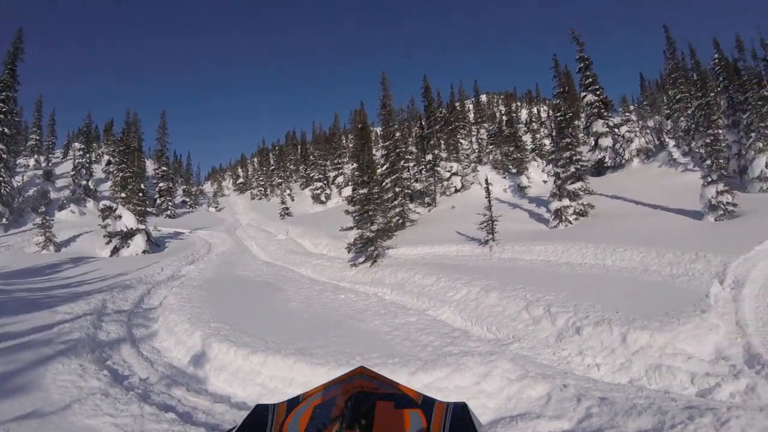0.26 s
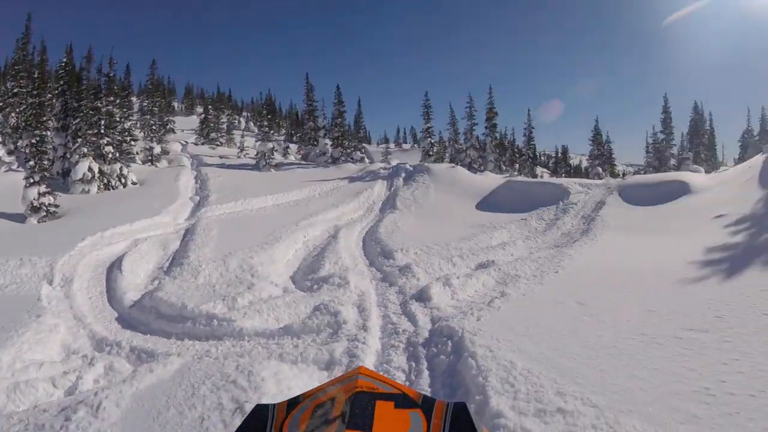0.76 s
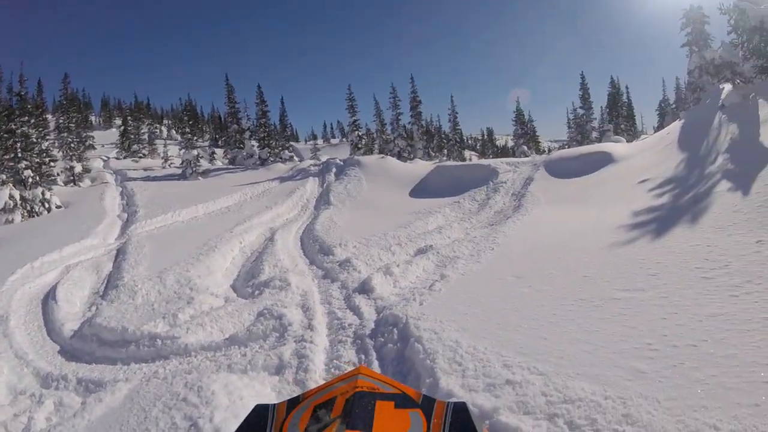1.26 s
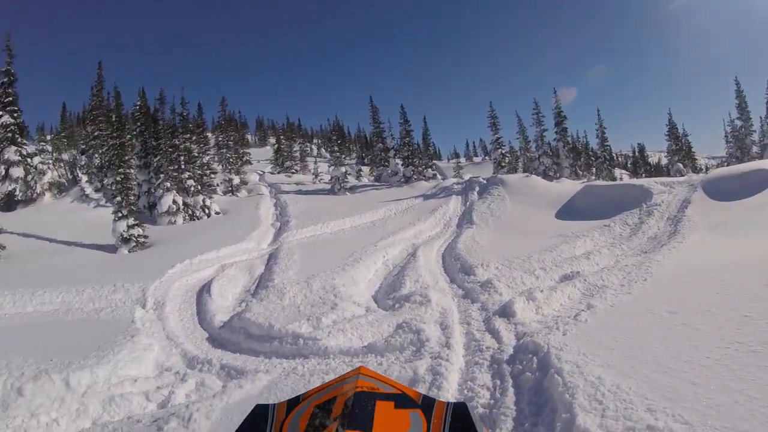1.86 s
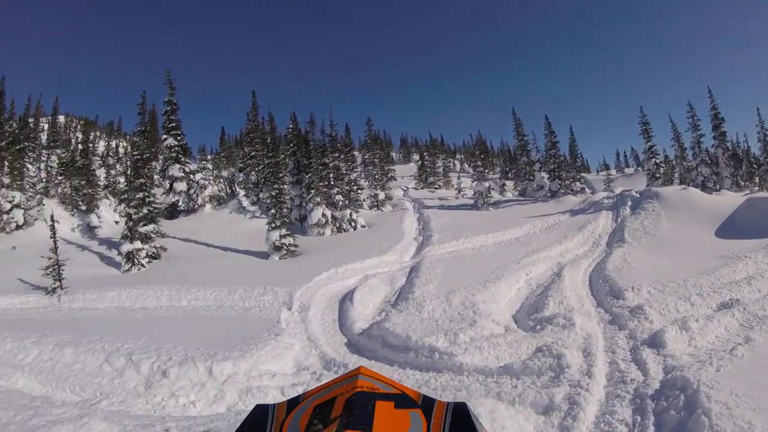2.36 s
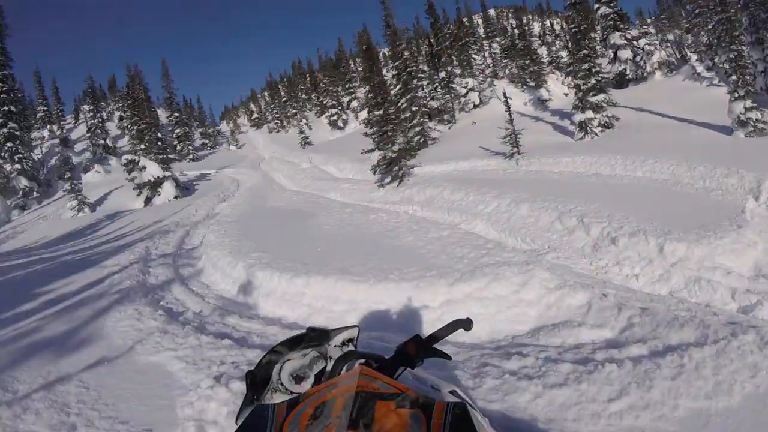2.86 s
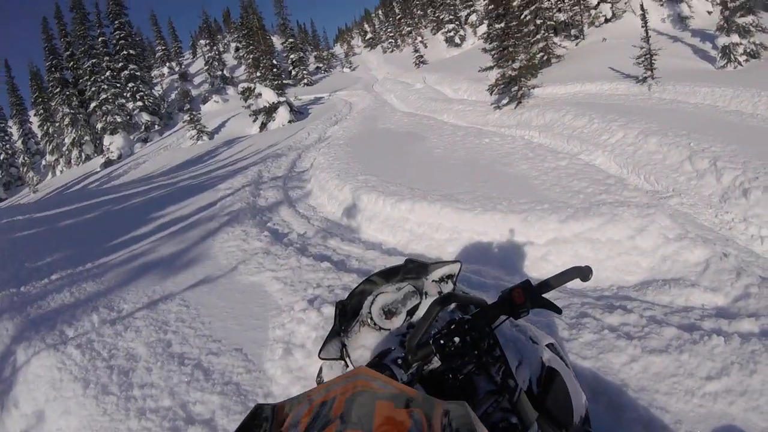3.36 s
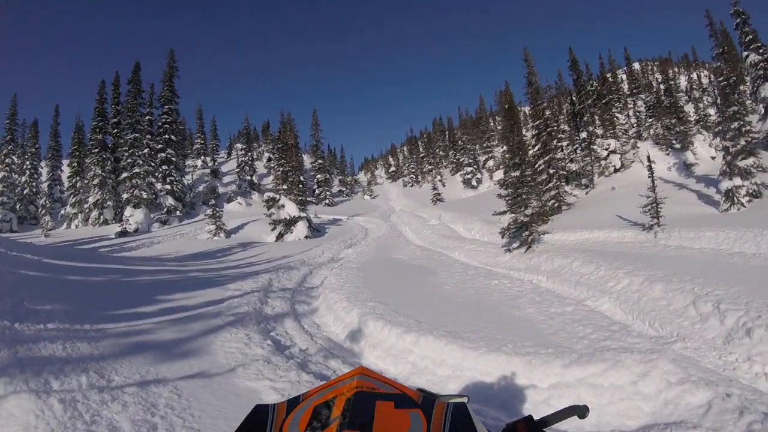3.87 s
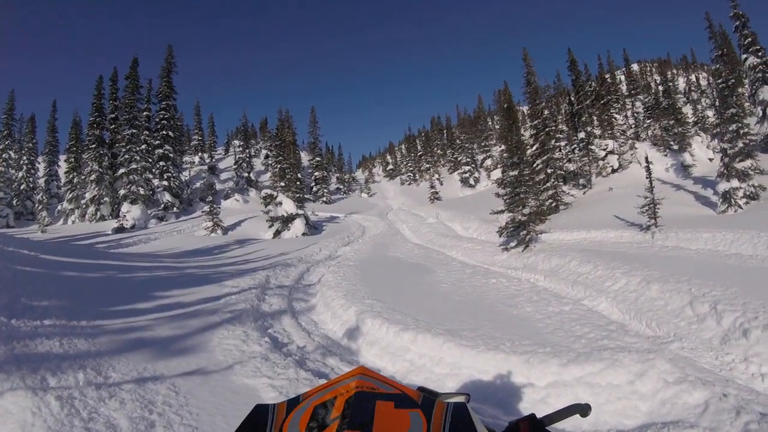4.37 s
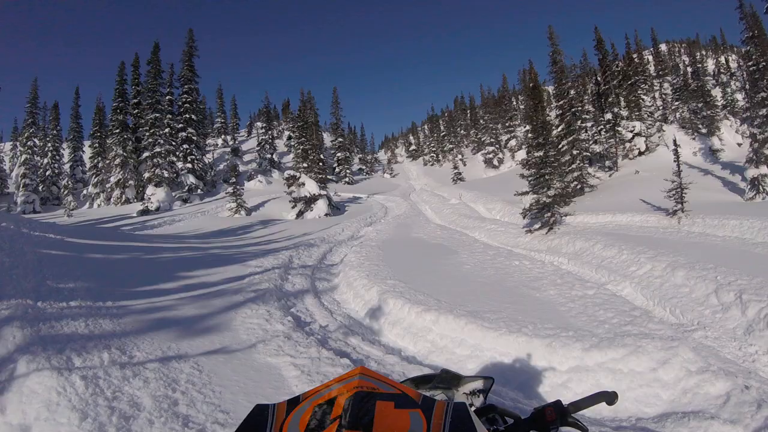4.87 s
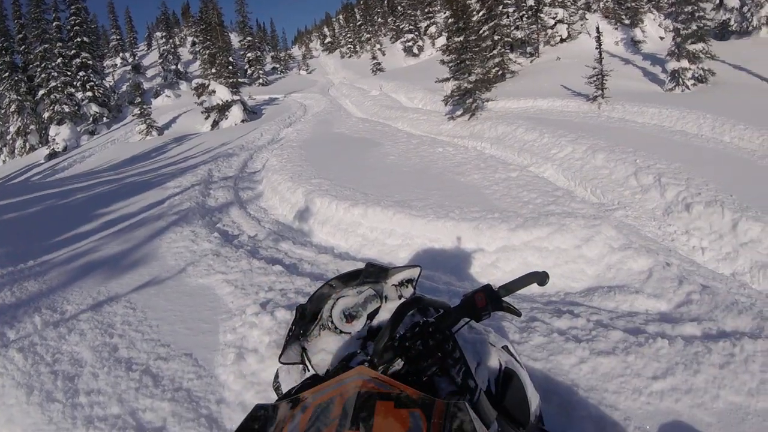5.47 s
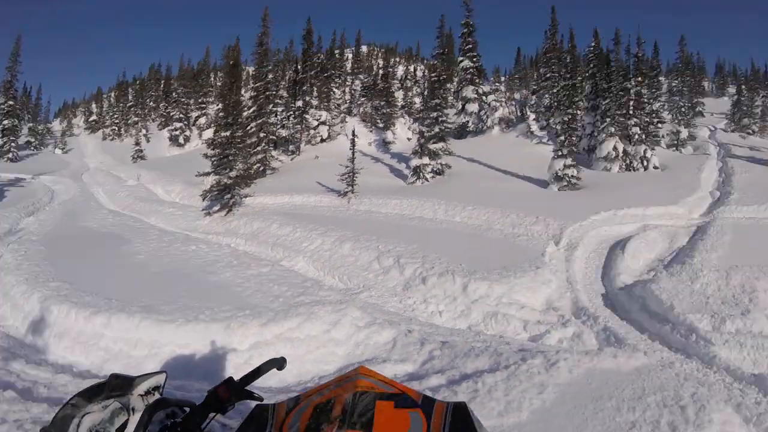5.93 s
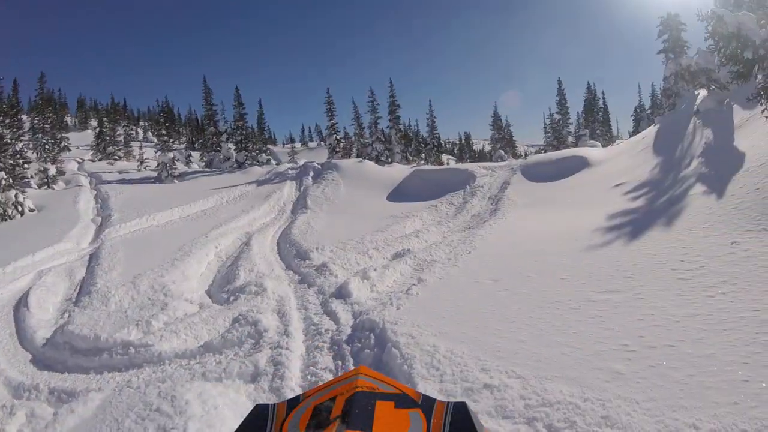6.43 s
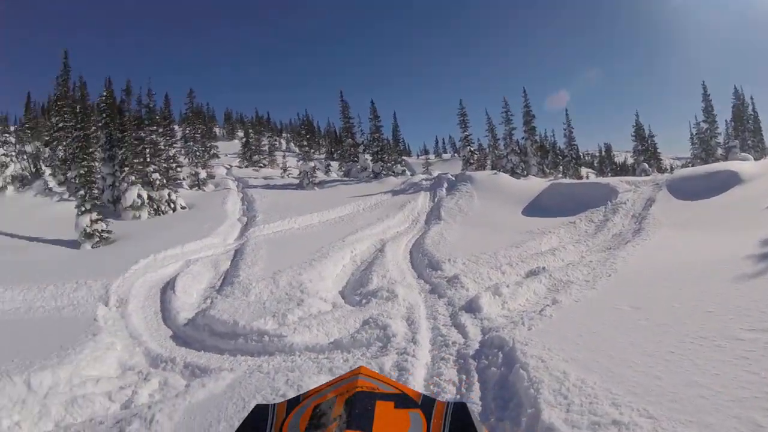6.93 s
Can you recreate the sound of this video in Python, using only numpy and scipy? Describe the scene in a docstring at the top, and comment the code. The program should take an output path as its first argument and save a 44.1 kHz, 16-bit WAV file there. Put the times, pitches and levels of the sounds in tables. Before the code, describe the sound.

Close, steady pulsing of an idling snowmobile engine outdoors, with uneven pops, knocking and light clinks of metal.

```python
"""A two-stroke, two-cylinder snowmobile settles to idle on open snow, heard from the rider's helmet.
In the first second and a half the engine slows. Its pistons throb and its silencer drones; most fuel
charges burn weakly, but each cylinder pops hard every few turns. The crankcase (the engine's housing)
knocks and the clutch rattles with each turn. From about 3 s the head turns toward the machine and
these metal sounds grow louder; just after 6 s it turns away and they fade, while the engine idles on."""
import sys
import numpy as np
from scipy import signal
from scipy.fft import rfft, irfft, next_fast_len
from scipy.io import wavfile

SR = 44100
rng = np.random.default_rng(int(sys.argv[2]) if len(sys.argv) > 2 else 0)


def store_pcm(level_fs):
    """Save levels as 16-bit WAV."""
    pcm = np.round(np.clip(level_fs, -1, 1) * 32767).astype(np.int16)
    wavfile.write(sys.argv[1], SR, np.atleast_2d(pcm).T)


N = 317520
TIME = np.arange(N) / SR

# Levels in the tables are relative: the functions below set the final mix.
# how fast the engine runs: time_s, strokes_per_s
ENGINE_SPEED = [(0.0, 73.21), (0.6, 63.26), (1.0, 59.73), (1.4, 57.71), (2.0, 60.11), (2.2, 59.45),
                (2.4, 62.55), (3.4, 64.03), (3.6, 61.98), (4.6, 61.24), (5.0, 62.77), (5.2, 61.94),
                (5.8, 64.14), (7.2, 63.54)]
# how hard the engine works: time_s, throb_db, octave_db, rasp_db
ENGINE_LOAD = [(0, -21, -32.5, -34), (.4, -22.5, -27.5, -35), (.7, -22, -30.5, -40.5),
               (1.1, -26.5, -26.5, -38.5), (2.2, -27.5, -29, -40.5), (2.9, -23.5, -27.5, -36.5),
               (4.5, -23.5, -28.5, -39), (5.7, -24.5, -26, -37), (6.5, -22, -30.5, -39),
               (7.2, -22, -29.5, -40.5)]
# firings that pop hard, once a cylinder has cleared its stale gas: start_s, level_db
HARD_POPS = [(0.289, -13.5), (0.422, -12.5), (0.624, -13.5), (0.704, -14), (0.817, -15), (0.899, -14),
             (1.066, -14), (1.151, -15.5), (1.236, -13.5), (1.321, -15), (1.406, -12), (1.492, -15.5),
             (1.579, -13.5), (1.63, -14.5), (1.732, -15), (1.817, -15), (1.867, -13.5), (2.002, -14),
             (2.018, -14), (2.118, -14), (2.135, -14.5), (2.217, -15.0), (2.334, -16), (2.383, -11.5),
             (2.462, -16), (2.671, -14.5), (2.829, -13), (2.969, -16), (2.985, -14), (3.096, -13),
             (3.175, -11), (3.363, -13.5), (3.41, -16), (3.489, -14.5), (3.537, -14), (3.65, -12),
             (3.666, -14), (3.891, -14.5), (3.972, -15), (4.021, -14.0), (4.103, -11), (4.152, -17.5),
             (4.265, -13), (4.411, -14.5), (4.574, -15.5), (4.657, -12.5), (4.737, -14), (4.851, -14),
             (4.899, -18.5), (5.026, -12.5), (5.123, -16), (5.17, -16.0), (5.282, -14), (5.299, -15),
             (5.428, -12), (5.507, -13.5), (5.587, -13), (5.633, -14), (5.742, -12.5), (5.789, -13.5),
             (5.914, -15.5), (5.993, -16), (6.165, -15.5), (6.181, -11), (6.289, -16), (6.368, -16),
             (6.446, -16), (6.586, -14.0), (6.602, -14.5), (6.727, -17), (6.807, -13.5), (6.874, -19.5),
             (6.978, -13.5), (6.994, -17.5), (7.153, -13)]
# the notes the exhaust pipe rings at: pitch_hz, width_hz, level_db
PIPE_NOTES = [(30.5, 8.2, 0), (70, 47.8, 1), (109.5, 59.3, -3), (122.2, 16, -14.5)]
# the notes the silencer rings at: pitch_hz, width_hz, level_db
SILENCER_NOTES = [(219.4, 11.3, 0), (250, 13, -0.5), (298.8, 26, -0.5), (376, 30, -1.5), (449, 28, -4)]
# loudness at the helmet as the head turns: time_s, knock_db, clatter_db, clutch_db
HEAD_TURN_LEVELS = [(0, -49, -37, -44), (.45, -40, -43.5, -48), (.78, -41.5, -47, -54),
                    (1.8, -42, -46, -55), (2.55, -41, -48, -50.5), (2.8, -42, -44, -47),
                    (3.25, -38, -37.5, -44.5), (3.73, -38, -41, -48.5), (4.9, -40, -41, -48),
                    (5.3, -41.5, -38.5, -45), (6.03, -40, -40.5, -45), (6.2, -43.5, -46.5, -53),
                    (7.2, -44, -45.5, -54)]

# the knocks in each turn, counted from the first piston's firing: offset_strokes, level_db
TURN_KNOCKS = [(.7, -8), (1.25, 0), (1.8, -4)]
# the notes the crankcase rings at: pitch_hz, width_hz, level_db
CASE_NOTES = [(345, 56, 3), (375, 16, 8), (699.4, 36, 3.5), (797, 26, 6), (898, 27, -5.5), (1374, 68, -6.5)]
# the tone of the crankcase clatter: pitch_hz, level_db
CLATTER_TONE = [(350, -16.5), (560, -5), (750, 0), (920, -1.5), (1030, 5), (1110, -4), (1220, -0.5),
                (1600, -6), (2000, -12), (2600, -14.5), (3600, -22.5), (4600, -35.5), (7000, -44.5)]
# the metallic ring of the main knock: pitch_hz, width_hz, level_db
RING_NOTES = [(985, 62, 0), (1040, 62, 0)]
# how loud that ring comes through: time_s, level_db
RING_LOUDNESS = [(0, -50.5), (.5, -47), (.9, -49.5), (2.7, -49), (3.0, -47), (3.25, -41.5), (3.55, -41.5),
                 (3.8, -44.5), (5.0, -46), (5.35, -42.5), (5.95, -45.5), (6.2, -51), (7.2, -53.5)]
# the tone of a sharp snap: pitch_hz, level_db
SNAP_TONE = [(900, -48.5), (1700, 11.5), (2500, 5), (3500, 1.5), (5000, -15.5), (9000, -13.5)]
# extra snaps on top of the regular ones: start_s, level_db
EXTRA_SNAPS = [(1.993, -4), (2.06, -4)]
# the hardest knocks in the crankcase: start_s, level_db
HARD_CASE_KNOCKS = [(3.082, -28), (3.206, -25), (3.309, -34), (4.208, -32.5), (5.677, -28), (5.906, -28),
                    (5.938, -27)]
# their short ring: pitch_hz, width_hz, level_db
HARD_KNOCK_NOTES = [(995, 160, 38), (1190, 180, 23)]

# the bright tone of the rattling clutch: pitch_hz, level_db
CLUTCH_TONE = [(2350, -32.5), (4000, -13.5), (4510, -12.5), (5310, 0.5), (5960, -5.5), (6300, 2),
               (6530, 4.5), (7360, -6), (9050, -11.5), (9520, -18.5), (12400, -61.5), (20900, -120)]
# a loose clutch part clinks, mostly in runs of one clink a turn: start_s, level_db
CLUTCH_CLINKS = [(0.019, -29), (0.046, -22.5), (0.072, -26.5), (0.103, -22.5), (0.108, -27), (0.142, -25),
                 (0.158, -25), (0.186, -25.5), (0.213, -26), (0.238, -36), (0.242, -33), (0.285, -31),
                 (0.29, -16), (0.295, -32), (0.301, -26), (0.329, -30), (0.386, -27), (0.448, -30),
                 (0.475, -23), (0.502, -25.5), (0.51, -36), (0.527, -32), (0.541, -24.5), (0.568, -27),
                 (0.6, -28), (0.631, -28), (0.665, -30), (0.95, -34), (1.047, -28), (1.08, -27),
                 (1.116, -33), (1.15, -30), (1.183, -36), (1.217, -35), (1.25, -29.5), (1.285, -27),
                 (1.292, -31), (1.319, -37), (1.353, -31), (1.386, -41), (1.419, -28), (1.455, -27),
                 (1.492, -27.5), (1.558, -27), (1.593, -27.5), (1.629, -27), (1.693, -37), (1.731, -36),
                 (1.763, -32), (1.798, -36), (1.831, -33), (2.251, -22), (2.258, -32), (2.276, -37),
                 (2.397, -31), (2.415, -30), (2.505, -31), (2.566, -31.5), (2.6, -36), (2.629, -31),
                 (2.665, -28.5), (2.697, -27), (2.728, -26.5), (2.737, -37), (2.758, -33), (2.792, -34),
                 (2.809, -33), (2.824, -24), (2.851, -32), (2.857, -30.5), (2.976, -32), (3.165, -37),
                 (3.194, -23.5), (3.227, -26), (4.282, -26.5), (4.413, -27.5), (4.805, -32.5), (5.487, -35),
                 (5.699, -40), (5.761, -38), (5.856, -38), (6.012, -27.5), (6.288, -34.5), (6.382, -31),
                 (6.415, -29.5), (6.538, -32), (6.57, -29.5), (6.726, -33), (6.79, -30.5), (6.821, -30),
                 (6.855, -29.5), (6.977, -31), (7.051, -31.5)]
# the ring of a hard clink: pitch_hz, width_hz, level_db
CLINK_NOTES = [(5390, 480, -11), (6510, 84, 0)]
# the deep tone of the background rumble: pitch_hz, level_db
RUMBLE_TONE = [(12, -19.5), (25, -9), (40, -6), (125, -4.5), (175, -15.5), (400, -19), (600, -29),
               (1200, -71)]

STROKES_PER_TURN, START_STROKES, IDLE_STROKES_PER_S = 2, 1.52, 63
SURGE_STROKES, SURGE_HZ = .04, 3
DRONE_DB, DRONE_WAVER_DB, DRONE_FOLLOWS_LOAD = -41.7, 1.2, .5
TICKS_PER_S, TICK_SPREAD_DB = 260, 2.2
TREBLE_CUTOFF_HZ, HISS_CUTOFF_HZ = 9750, 13500


def crank():
    """Count the piston strokes so far; the crank surges after each hard pop and sags between them."""
    kicks = listed_hits(HARD_POPS)
    surge = signal.sosfilt(signal.butter(2, SURGE_HZ, fs=SR, output="sos"), kicks - kicks.mean())
    return START_STROKES + np.cumsum(curves(ENGINE_SPEED)[0]) / SR + SURGE_STROKES * unit_level(surge)


def exhaust(strokes, rasp_db):
    """Hard and weak firings thump through the pipe; every stroke rasps in the silencer."""
    hard = from_db(-2.5) * listed_hits(HARD_POPS)
    weak = repeating_hits(strokes, offset=0.079, every=1, jitter_s=0.0015)
    thump = from_db(53.5) * resonate(hard + from_db(-44) * weak, PIPE_NOTES)
    thump = signal.sosfilt(signal.butter(1, 900, fs=SR, output="sos"), thump)
    puffs = repeating_hits(strokes, offset=0.9, every=1) + from_db(15) * hard
    rasp = resonate(unit_level(puffs) + from_db(-3) * burst(puffs, decay_s=0.0049), SILENCER_NOTES)
    return thump + from_db(rasp_db - 6) * unit_level(rasp)


def piston_throb(strokes, throb_db, octave_db, lag_strokes=0.725):
    """Each piston gulps air just after its port opens, making a low note and the octave above."""
    phase = 2 * np.pi * (strokes - lag_strokes)
    return -from_db(throb_db) * np.cos(phase) - from_db(octave_db) * np.cos(2 * phase)


def silencer_drone(strokes, rasp_db):
    """Gas flow repeats every turn and hums; each overtone swells as it nears a silencer note."""
    turns = strokes / STROKES_PER_TURN
    turns_per_s = curves(ENGINE_SPEED)[0] / STROKES_PER_TURN
    hum = 0
    for multiple in range(6, 16):
        power = sum(from_db(db) ** 2 / (1 + (2 * (multiple * turns_per_s - hz) / width) ** 2)
                    for hz, width, db in SILENCER_NOTES)
        gain = np.sqrt(power) * from_db(DRONE_WAVER_DB * waver(points_per_s=6))
        hum = hum + gain * np.cos(2 * np.pi * (multiple * turns + rng.random()))
    return from_db(DRONE_DB + DRONE_FOLLOWS_LOAD * (rasp_db - rasp_db.mean())) * unit_level(hum)


def crankcase(strokes, knock_db, clatter_db):
    """Pistons and bearings knock and clatter in the case; once a turn it rings and a part snaps."""
    knocks = sum(from_db(db) * repeating_hits(strokes, offset) for offset, db in TURN_KNOCKS)
    rough_knocks = unit_level(knocks) + from_db(-10) * burst(knocks, decay_s=0.015)
    case = unit_level(resonate(rough_knocks, CASE_NOTES))
    clatter_noise = burst(knocks, decay_s=0.022) + from_db(0.5) * rng.standard_normal(N)
    clatter = from_db(clatter_db) * unit_level(shape_tone(clatter_noise, CLATTER_TONE))
    strikes = repeating_hits(strokes, offset=1.1, spread_db=1.5)
    ring = from_db(curves(RING_LOUDNESS)[0]) * unit_level(resonate(strikes, RING_NOTES))
    snap_hits = repeating_hits(strokes, offset=1.64, spread_db=1.1) + listed_hits(EXTRA_SNAPS)
    snaps = unit_level(shape_tone(burst(snap_hits, decay_s=0.0015), SNAP_TONE))
    knocking = from_db(knock_db) * (from_db(-3.5) * case + from_db(-19.8) * snaps)
    hard_knocks = resonate(listed_hits(HARD_CASE_KNOCKS), HARD_KNOCK_NOTES)
    return knocking + ring + clatter + hard_knocks


def clutch(strokes, clutch_db):
    """Loose steel parts tick and hiss all the time, shake once a turn and now and then clink hard."""
    is_tick = rng.random(N) < TICKS_PER_S / SR
    ticks = is_tick * from_db(TICK_SPREAD_DB * np.minimum(rng.exponential(1, N), 3))
    shakes = repeating_hits(strokes, offset=0.3, jitter_s=0.0012)
    jingle = burst(ticks, decay_s=0.0013) + from_db(-0.5) * rng.standard_normal(N)
    jingle += from_db(-6) * burst(shakes, decay_s=0.0079)
    clinks = listed_hits(CLUTCH_CLINKS)
    chatter = np.std(clinks) * np.diff(burst(clinks, decay_s=0.0019), prepend=0)   # hard hits: brighter
    contacts = from_db(clutch_db) * unit_level(jingle) + from_db(5.5) * chatter
    tone_gain = np.std(shape_tone(rng.standard_normal(N), CLUTCH_TONE))
    rattle = shape_tone(contacts, CLUTCH_TONE) / tone_gain
    ring = from_db(27.5) * resonate(clinks, CLINK_NOTES)
    return rattle + ring + from_db(-13) * shape_tone(contacts, SNAP_TONE)


def low_rumble():
    """A steady low background rumble, like wind on the microphone."""
    return from_db(-34) * unit_level(shape_tone(rng.standard_normal(N), RUMBLE_TONE))


def repeating_hits(strokes, offset, every=STROKES_PER_TURN, spread_db=2.0, jitter_s=0.00022):
    """Clicks a set number of strokes apart (normally one turn), uneven in strength and timing."""
    due_strokes = every * np.arange(-SR // 1000, N // 500) + offset
    early_or_late, strength = rng.standard_normal((len(due_strokes), 2)).T
    times = np.interp(due_strokes, strokes, TIME, left=-1, right=-1) + jitter_s * early_or_late
    return clicks(times, from_db(spread_db * np.clip(strength, -2, 2)))


def listed_hits(rows):
    """One click for each row of start_s, level_db."""
    start_s, level_db = np.transpose(rows)
    return clicks(start_s, from_db(level_db))


def clicks(times, sizes):
    """A one-sample spike at each time."""
    at = np.round(np.asarray(times) * SR).astype(int)
    inside = (at >= 0) & (at < N)
    return np.bincount(at[inside], sizes[inside], N)


def burst(hits, decay_s):
    """Each hit lets off a puff of noise that dies away."""
    power = signal.lfilter([1], [1, -np.exp(-2 / (decay_s * SR))], hits ** 2 + 1e-18)
    return unit_level(np.sqrt(power) * rng.standard_normal(N))


def resonate(x, notes):
    """Make a sound ring at each note, added with alternating sign; narrow notes ring longer."""
    out = 0
    for k, (hz, width, db) in enumerate(notes):
        decay = np.exp(-np.pi * width / SR)
        feedback = [1, -2 * decay * np.cos(2 * np.pi * hz / SR), decay * decay]
        ring = (1 - decay * decay) / 2 * signal.lfilter([1, 0, -1], feedback, x + 1e-18)
        out = out - (-1) ** k * from_db(db) * ring
    return out


def shape_tone(x, tone):
    """Turn each pitch up or down as a tone table says."""
    size = 2 * next_fast_len(N // 2 + SR // 10)
    hz, db = np.transpose(tone)
    all_hz = np.arange(size // 2 + 1) * SR / size
    gain = from_db(np.interp(np.log(all_hz + 1), np.log(hz), db))
    # a minimum-phase filter: it rings only after a hit, never before
    cepstrum = irfft(np.log(gain))
    cepstrum[1:size // 2] *= 2
    cepstrum[size // 2 + 1:] = 0
    return irfft(rfft(x, size) * np.exp(rfft(cepstrum)))[:N]


def waver(points_per_s):
    """A slow random wobble, about 1 in size."""
    points = rng.standard_normal(int(N / SR * points_per_s) + 2)
    return unit_level(np.interp(TIME * points_per_s, np.arange(len(points)), points))


def curves(rows):
    """Join a table's points over time with straight lines, one curve for each value column."""
    time_s, *columns = np.transpose(rows)
    return [np.interp(TIME, time_s, column) for column in columns]


def from_db(db):
    """Turn decibels into a number to multiply by."""
    return 10 ** (np.asarray(db) / 20)


def unit_level(x):
    """Scale a sound so its average level (rms) is 1."""
    return x / np.sqrt(np.mean(x ** 2) + 1e-20)


def scene():
    """The engine's gas and metal sounds over a low rumble, in mono; snow gives no echo."""
    strokes = crank()
    # loose parts strike later in a faster turn
    late_strokes = strokes - 0.06 * (curves(ENGINE_SPEED)[0] - IDLE_STROKES_PER_S)
    throb_db, octave_db, rasp_db = curves(ENGINE_LOAD)
    knock_db, clatter_db, clutch_db = curves(HEAD_TURN_LEVELS)
    throb = piston_throb(strokes, throb_db, octave_db)
    gas = throb + silencer_drone(strokes, rasp_db) + exhaust(strokes, rasp_db)
    metal = crankcase(late_strokes, knock_db, clatter_db) + clutch(late_strokes, clutch_db)
    return (gas + metal + low_rumble())[None]


def record(dry):
    """The deepest bass and the high treble are cut away, and a faint hiss is added."""
    heard = signal.sosfilt(signal.butter(1, 8, "high", fs=SR, output="sos"), dry)
    heard = signal.sosfilt(signal.ellip(10, .3, 70, TREBLE_CUTOFF_HZ, fs=SR, output="sos"), heard)
    heard = heard + from_db(-68.5) * rng.standard_normal(dry.shape)
    return signal.sosfilt(signal.ellip(10, .3, 70, HISS_CUTOFF_HZ, fs=SR, output="sos"), heard)


dry = scene()
out = record(dry)
store_pcm(out)
```